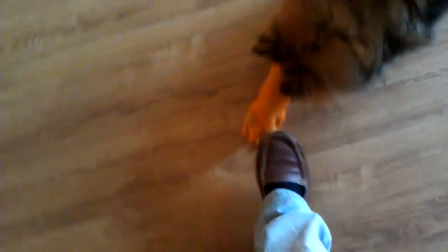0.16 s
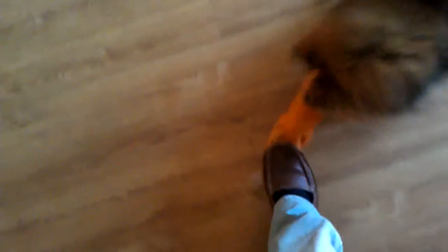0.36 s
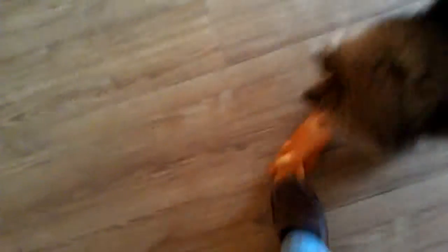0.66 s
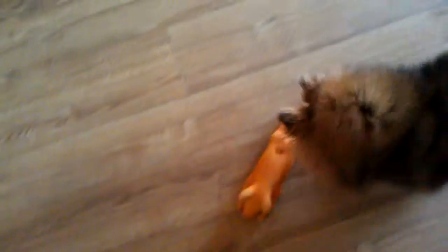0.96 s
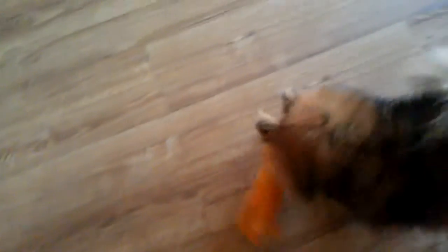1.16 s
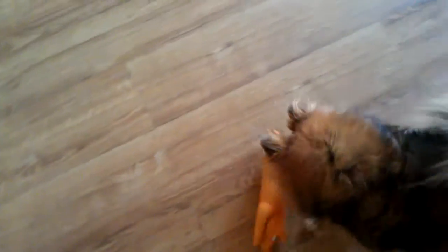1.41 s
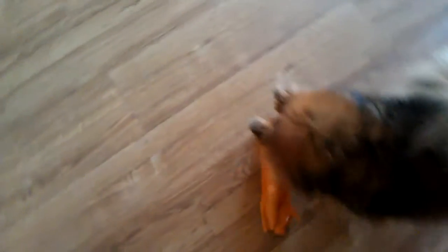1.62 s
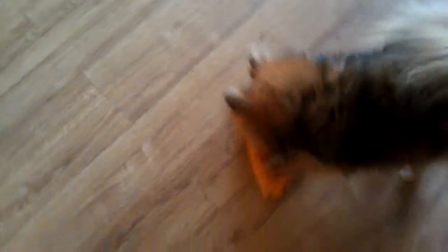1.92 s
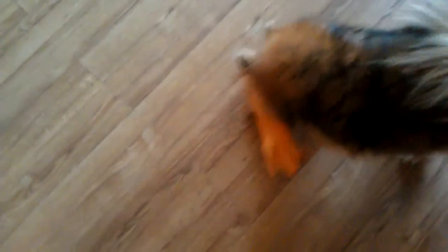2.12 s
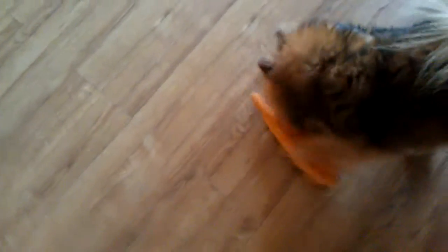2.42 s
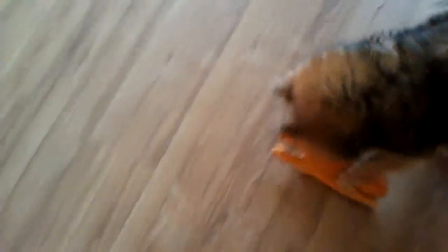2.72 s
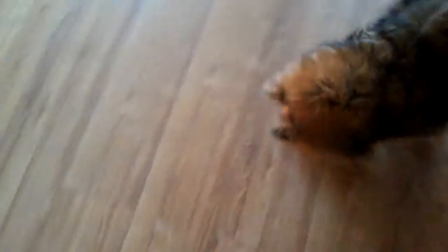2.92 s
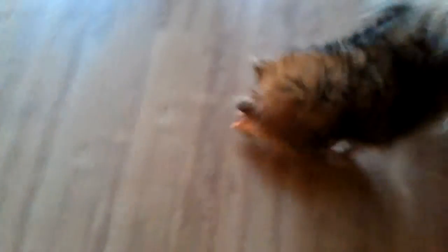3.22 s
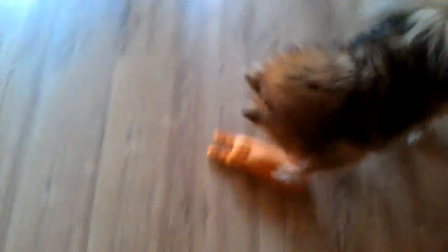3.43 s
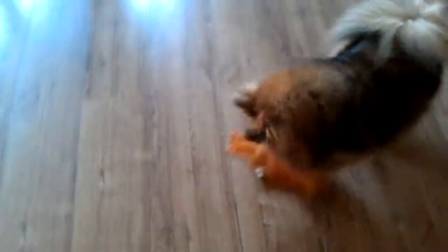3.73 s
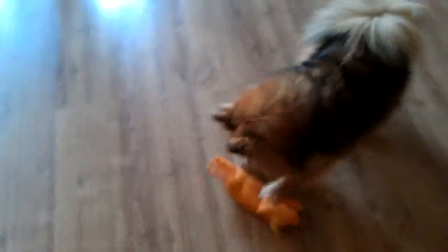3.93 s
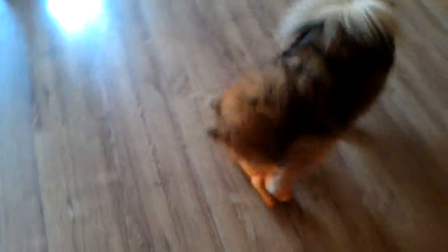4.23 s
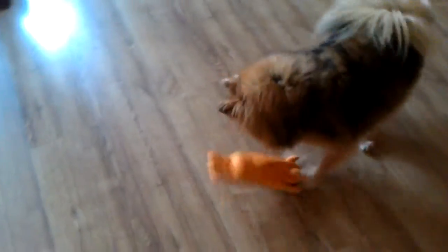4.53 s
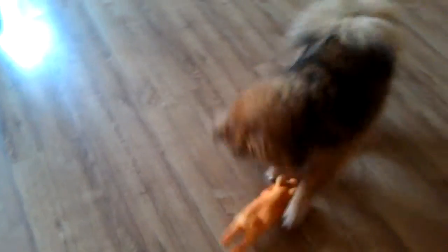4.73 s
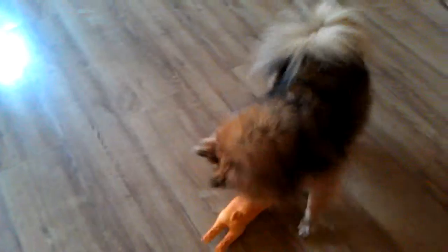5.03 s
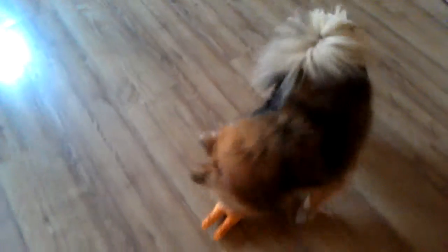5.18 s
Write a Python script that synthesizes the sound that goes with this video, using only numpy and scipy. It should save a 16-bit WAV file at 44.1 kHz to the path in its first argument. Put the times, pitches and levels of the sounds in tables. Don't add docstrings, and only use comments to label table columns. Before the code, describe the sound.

A small dog worries a rubber squeaky toy on laminate in a bare, echoing room, heard by a handheld stereo phone about a metre above. Light scuffs and claw ticks open; a weak nip squeaks at 0.3 s with a thump at 0.4, then a swelling nasal squeeze at 0.5-0.63. A short high double squeak at 1.1 ends in a sharp clicking slap at 1.2. After a quieter gap, a long squeak arches up and falls at 1.85-2.05. Small paw taps and a barely audible thin refill whistle follow around 2.3-2.6. A fluttering chew at 2.7-2.9 lands in heavy thumps. Activity then thickens: a faint nip at 3.43, firm squeak at 3.6, rising squeeze at 3.95-4.05, among claw clicks, rubber smacks and skitters. Weak nips at 4.5 and a low dying wheeze at 4.7 fade into small taps and scuffs until about 5.4.

```python
import sys
import numpy as np
from scipy import signal
from scipy.fft import rfft, irfft, next_fast_len
from scipy.io import wavfile
from scipy.ndimage import uniform_filter1d, map_coordinates

SR = 44100
rng = np.random.default_rng(int(sys.argv[2]) if len(sys.argv) > 2 else 0)


def gain_from_db(level_db):
    decades = np.asarray(level_db, float) / 20
    return 10 ** decades


def inscribe(sig):
    pcm = np.round(np.clip(np.atleast_2d(sig).T, -1, 1) * 32767)
    wavfile.write(sys.argv[1], SR, pcm.astype(np.int16))


N = 236263


def unit(x):
    return x / np.sqrt(np.mean(x ** 2) + 1e-20)


def along(points, hz):
    f, v = np.transpose(points)
    return np.interp(np.log(hz + 1), np.log(f + 1), v)


def wobble(rate):
    knots = rng.standard_normal(int(N * rate / SR) + 4)
    return map_coordinates(knots, [np.arange(N) * rate / SR])


def filtered(x, response):
    m = next_fast_len(x.shape[-1] + SR // 2)
    spectrum = rfft(x, m) * response(np.fft.rfftfreq(m, 1 / SR))
    return irfft(spectrum, m)[..., :x.shape[-1]]


def modes(table):
    def response(f):
        total = 0
        for k, (centre, width, db) in enumerate(table):
            total = total + (-1) ** k * gain_from_db(db) * 1j * f * width / (centre ** 2 - f * f + 1j * f * width)
        return total
    return response


def panned(x, db):
    return x * gain_from_db([[db / 2], [-db / 2]])


# freq_hz, left_right_likeness [0-1]
LIKENESS = [(30, .6), (70, 0.49), (125, 1), (300, 0.97), (600, 0.83), (1200, 0.58), (4000, 0.059)]


def diffuse(pair):
    def mid_side(hz):
        turn = np.arccos(np.clip(along(LIKENESS, hz), -1, 1)) / 2
        return np.array([np.cos(turn), np.sin(turn)])
    mid, side = filtered(pair, mid_side)
    return np.array([mid + side, mid - side])


# freq_hz, level_db [dB per Hz]
HUSH_SPECTRUM = [(15, -27.5), (25, -8), (55, -4.5), (87, -3), (231, 7.5), (938, -4.5), (2500, -5),
                 (4020, -9), (7000, -10), (7990, -12), (13900, -14)]


def air():
    hush = filtered(rng.standard_normal((2, N)), lambda hz: gain_from_db(along(HUSH_SPECTRUM, hz)))
    return gain_from_db(-52.5) * unit(diffuse(hush))


# start_s, length_s, level_db, fade_db [start to end], brightness_db
DRAG_STROKES = [(0.0, 0.084, -24.5, 30.5, -6.5), (0.436, 0.12, -29.5, 1.5, -7.5),
                (0.869, 0.064, -33, 8, -2), (0.932, 0.088, -41, -12, -8.5), (1.01, 0.038, -49.5, -9, 5),
                (1.024, 0.081, -38.5, 2, 8.5), (2.03, .17, -39.5, 9, 0), (1.195, 0.06, -11.5, 29.5, -21.5),
                (1.412, 0.15, -33.5, 23, -3), (2.34, .064, -39.5, 22, -6), (2.574, 0.26, -59, -12.5, -1.5),
                (2.885, 0.16, -22.5, 27, -13), (3.093, 0.13, -39, 22, 2), (3.469, 0.077, -27.5, 5.5, -6),
                (3.536, 0.044, -22.5, 5.5, -2), (3.66, 0.043, -27, 34.5, 1), (3.888, .05, -40, 2, -0.5),
                (4.042, .03, -27.5, -0.5, -6), (4.072, 0.068, -13.5, 19, -9),
                (4.272, 0.135, -45.5, -4.5, -13), (4.565, 0.11, -31.5, 4.5, -0.5),
                (4.762, 0.048, -33.5, 5, 4.5), (4.866, 0.11, -29.5, 8, -4), (5.072, 0.048, -44.5, 9, 4.5)]
# freq_hz, level_db [dB per Hz]
DRAG_SPECTRUM = [(410, -34.5), (700, -5.5), (933, -24.5), (2000, -3.5), (4410, -2), (5520, -2), (9100, -9),
                 (10800, -7), (13900, -18)]
# freq_hz, width_hz, level_db
FLOOR_BOARDS = [(132, 27, 0.5), (204.2, 27.2, 3.5), (250, 54, 0), (331.4, 51.6, -1.5), (438, 76, -7.5),
                (548, 61, -2.5), (756, 340, -10.5)]
# time_s, level_db
WEIGHT_SHIFTS = [(0.0, -58.5), (0.46, -44.5), (0.72, -72.5), (0.94, -48), (1.34, -41), (1.89, -85),
                 (2.1, -46), (2.42, -60), (2.76, -44), (2.88, -80.5), (3.39, -39), (3.69, -35),
                 (3.94, -35.5), (4.06, -45.5), (4.48, -48), (4.79, -40), (5.13, -80.5), (5.36, -41)]


def scuffs():
    t, dull, bright = np.arange(N) / SR, np.zeros(N), np.zeros(N)
    for start, length, db, fade_db, bright_db in DRAG_STROKES:
        edge = np.clip(np.minimum((t - start + 1 / SR) / 0.0012, (start + length - t) / 0.015), 0, 1)
        stroke = edge * gain_from_db(db - fade_db * np.clip((t - start) / length, 0, 1))
        dull += stroke * gain_from_db(-2.5)
        bright += stroke * gain_from_db(bright_db - 7)

    def below(hz):
        return gain_from_db(along([(300, -67.0)] + DRAG_SPECTRUM, hz)) / (1 + (hz / 6000) ** 6)

    def above(hz):
        return gain_from_db(along([(300, -60)] + DRAG_SPECTRUM, hz)) / (1 + (6000 / (hz + 1)) ** 6)

    clumps_db = 3 * wobble(500) + 3 * wobble(45)
    snags = rng.standard_normal((2, N)) * gain_from_db(clumps_db)
    hiss = diffuse(dull * unit(filtered(snags, below)) + bright * unit(filtered(snags, above)))
    creep = rng.standard_normal(N) * gain_from_db(4.2 * wobble(30))
    rumble = unit(filtered(creep, modes(FLOOR_BOARDS)))
    return hiss, gain_from_db(np.interp(t, *np.transpose(WEIGHT_SHIFTS))) * rumble


# freq_hz, t60_s
ROOM_DECAY = [(120, 0.31), (500, 0.44), (2000, 0.4), (5000, 0.34), (12000, 0.28)]


def room(x, gap_s):
    hz, t, z = signal.stft(rng.standard_normal((2, SR)), SR, nperseg=256)
    decay = gain_from_db(-60 * t / along(ROOM_DECAY, hz)[:, None])
    tail = diffuse(signal.istft(z * decay, SR, nperseg=256)[1])
    tail = np.pad(tail / np.linalg.norm(tail[0]), ((0, 0), (round(gap_s * SR), 0)))
    return signal.fftconvolve(x[None], tail, axes=1)[:, :N]


# start_s, level_db, left_right_db
PAW_LANDINGS = [(0.4212, -22.5, -1), (0.6937, -31, 0), (1.2005, -21, -3.5), (1.5318, -44.5, 8),
                (1.8163, -42.5, 2.5), (2.2094, -41, -10), (2.3068, -34.5, 0), (2.3445, -30, 0),
                (2.431, -26.5, 3), (2.4946, -33.5, -0.5), (2.5178, -33.5, -2), (2.533, -42, 2.5),
                (2.879, -19.5, 5), (2.909, -20, 13), (3.0976, -32.5, 1.5), (3.3524, -36.5, -9),
                (3.3737, -39.5, -3.5), (3.417, -36.5, 3.5), (3.7011, -15.5, 0), (4.357, -30.5, -3),
                (4.62, -30.5, 3.5), (4.552, -32.5, 1), (4.335, -30.5, .5)]
# start_s, level_db, left_right_db
CLAW_TAPS = [(0.0559, -26, -2), (0.165, -40, 0), (0.224, -43, -9.5), (0.4407, -21, -1.5), (0.922, -27, 1.5),
             (0.9564, -24.5, 0.5), (0.9953, -26, 1.5), (1.3399, -29.5, -4), (1.3788, -22.5, -0.5),
             (1.7928, -43, 3), (3.1277, -34, -3.5), (3.1727, -30, -3.5), (3.3316, -34, 0),
             (3.542, -17.5, -2.5), (3.8696, -14.5, 3.5), (4.0771, -15, 7.5), (4.2756, -22, 2),
             (4.336, -25, -1), (4.7723, -24.5, 3), (4.8986, -25.5, -2), (5.0425, -31.5, -1)]
# start_s, level_db, left_right_db
RUBBER_SMACKS = [(0.8734, -20.5, 2.5), (1.1905, -16.5, 2.5), (1.1985, -22, 0), (1.4156, -19, -0.5),
                 (1.4994, -39, 13.5), (2.431, -49.5, 1.4), (2.9863, -31.5, 3), (3.7474, -18.5, 0.5),
                 (4.1039, -20, 15), (4.4472, -35, 5.5), (4.5735, -20, 1), (4.7637, -21.5, 1.5),
                 (4.8558, -21, 25.5), (4.8986, -28, 2.5), (5.0797, -32.5, 1)]
# start_s, level_db, pitch_hz
SOFT_THUMPS = [(0.324, -20, 516), (0.388, -28.5, 252), (0.4223, -13.5, 485), (0.472, -31, 428),
               (1.164, -23, 405), (1.261, -29, 260), (1.612, -42, 322), (2.04, -60, 237),
               (2.068, -30.5, 208), (2.183, -32, 238), (2.368, -36, 248), (2.919, -16, 250),
               (3.019, -31, 207), (3.474, -20.5, 191), (3.506, -20.5, 289), (3.598, -26.5, 249),
               (3.678, -24, 207), (3.749, -41, 210), (3.802, -35.5, 278), (3.902, -18.5, 264),
               (4.057, -23, 239), (4.299, -28.5, 250), (4.624, -17.5, 333), (4.644, -20, 316),
               (5.275, -35.5, 235), (5.326, -47, 247)]
# freq_hz, width_hz, level_db
CLAW_MODES = [(2434, 530, 4.5), (1020, 580, -1.5), (4000, 640, -5)]
# freq_hz, width_hz, level_db
SLAP_MODES = [(6160, 3200, -1), (11000, 3500, 0), (3160, 2600, -3)]


def contacts():
    tick, push, slap = np.zeros((2, N)), np.zeros(N + SR), np.zeros((2, N + SR))
    t = np.arange(SR // 4) / SR
    # (claw tick dB, board thump dB, bright slap dB)
    kinds = ((PAW_LANDINGS, (-0.8, 2.6, -16)), (CLAW_TAPS, (0, -9.5, -16)), (RUBBER_SMACKS, (-26.5, -9.5, 0)))
    for rows, mix in kinds:
        for start, db, pan in rows:
            i = round(start * SR)
            tick_db, thump_db, slap_db = db + np.array(mix)
            tick[:, i:i + 1] += panned(gain_from_db(tick_db + 24), pan)
            scatter = rng.standard_normal(len(t)) * gain_from_db(-60 * t / 0.03)
            push[i:i + len(t)] += gain_from_db(thump_db + 28) * 0.4 * (gain_from_db(-60 * t / 0.002) + scatter)
            common, *own = rng.standard_normal((3, len(t)))
            burst = common * gain_from_db(-60 * t / 0.007) + 0.35 * np.array(own) * gain_from_db(-60 * t / 0.1)
            slap[:, i:i + len(t)] += panned(gain_from_db(slap_db + 1.5) * burst, pan)
    for start, db, hz in SOFT_THUMPS:
        push[round(start * SR):][:len(t)] += gain_from_db(db + 8 - 60 * t / 0.023) * np.sin(2 * np.pi * hz * t)
    thumps = filtered(push[:N], lambda hz: modes(FLOOR_BOARDS)(hz) / (1 + 1j * hz / 900) ** 2)
    ticks = filtered(tick, lambda hz: modes(CLAW_MODES)(hz) / (1 + 1j * hz / 4000) ** 2)
    return ticks + filtered(slap[:, :N], modes(SLAP_MODES)), thumps


# time_s, pitch_hz, level_db
EARLY_BITES = [
    [(.298, 920, -32.5), (.308, 942, -27), (.322, 947, -22.5), (.34, 923, -23.5), (.358, 854, -26),
     (.372, 879, -27.5), (.392, 847, -30.5), (.42, 841, -36)],
    [(.497, 872, -23), (.512, 909, -21.5), (.542, 951, -15), (.556, 948.7, -11.5), (.572, 941, -10),
     (.593, 918, -14.5), (.612, 850, -22.5), (.62, 794, -35), (.64, 690, -52.5)],
    [(1.086, 957, -22.5), (1.096, 1033, -18.5), (1.107, 1082, -17.5), (1.125, 1126, -8.5),
     (1.15, 1124, -12.5), (1.163, 1096, -8), (1.176, 1020, -11.5), (1.186, 950, -19.5)],
    [(1.849, 896, -20), (1.868, 989, -16), (1.893, 1053, -11), (1.925, 1092, -10.5), (1.955, 1068, -7),
     (1.98, 995, -14.5), (2.002, 879, -18.5), (2.03, 779, -37), (2.07, 718, -35)],
    [(2.708, 877, -27), (2.733, 980, -9.5), (2.752, 935, -11.5), (2.774, 969, -8.5), (2.806, 869.5, -18.5),
     (2.835, 932, -11.5), (2.849, 898, -16), (2.862, 917, -15), (2.889, 864, -21)],
]
# time_s, pitch_hz, level_db
LATE_BITES = [
    [(3.425, 918, -22), (3.434, 953, -24), (3.447, 990, -17.5), (3.46, 1013, -20), (3.472, 1007, -18.5),
     (3.484, 984, -25.5), (3.495, 960, -31.5)],
    [(3.571, 990, -19), (3.59, 1043, -9.5), (3.61, 1057, -9), (3.628, 1014, -8), (3.642, 996, -14.5),
     (3.657, 961, -17.5), (3.668, 850, -18.5)],
    [(3.936, 969, -19), (3.956, 1025, -10.5), (3.965, 1024, -17.5), (3.972, 1031, -12), (3.99, 1088, -8),
     (4.008, 1096, -5.5), (4.026, 1087, -10), (4.038, 999, -15.5), (4.05, 913, -14)],
    [(4.515, 783, -35), (4.532, 881, -31.5), (4.552, 877.5, -24.5), (4.566, 837, -41)],
    [(4.66, 735, -32), (4.68, 760, -25.5), (4.705, 742.2, -27.5), (4.73, 733, -38), (4.76, 722, -39),
     (4.8, 712, -44)],
]
# freq_hz, level_db
REED_TUBE = [(700, -26.5), (1100, -11.5), (2200, -8.5), (3200, -11), (4300, 2), (5300, -9), (6500, -19),
             (8000, -23.5), (11000, -27), (14000, -44.5)]
# left_right_db, floor_echo_left_ms, floor_echo_right_ms,
# start_slack [0-1], brightness [dB per octave at full bite]
TOY_PLACES = [(1.5, .31, 0.43, 0.5, 1.5), (2, .33, 0.37, 0.05, -0.5), (4.5, 0.35, 0.74, 0.3, 5),
              (5, 0.323, 0.27, 0.12, 2), (3.5, 0.322, 0.37, 0.3, 2), (4.5, 0.4, 0.61, 0.04, 3),
              (4.5, 0.33, 0.88, 0.08, 3.5), (8, 0.29, 0.32, 0.05, 5.5), (4, 0.88, 0.29, 0.14, 2.5),
              (3.5, 0.28, 0.24, 0.1, 1.5)]
# level_db of overtones 1, 2, 3, 5, 6
OVERTONE_SHADES = [(12, 4.5, 5.5, -4.5, -7.5), (-4, -10, -5, -2.5, -3), (5.5, 9, 10.5, -2.5, 4.5),
                   (-4, -3.5, -5, -1, 0), (-8, -8, -7.5, -3.5, -7.5), (6.5, -1, 3, -10.5, -1.5),
                   (0, -5.5, -2.5, -1, 0.5), (4, 1.5, -1, -0.5, 3.5), (5.5, -1, -1.5, -11, -6),
                   (10, -3.5, -1.5, -9, -12.5)]
UPPER_OVERTONES_DB = [-3.5, -3.5, 1.5, -1.5, -5.5, 0, -1, -2, -1.5, -7]
WALL_SENDS_DB = [-.5, -4, 0.5, 0, -3, 1.5, 0, -0.5, -2, -1.5]
SPEAKING_MS = [3.5, 7, 3.5, 7, 3.2, 2, 4, 2.5, 8.7, 6]
FLICKER_DB = [4, .8, 3.5, 2.2, 1.3, 4.5, 3, 2.3, 4, 3.2]
TURBULENCE = [.22, .03, .2, .25, .12, .35, .2, .26, .2, .16]


def squeaks():
    toy, sent, orders = np.zeros((2, N)), np.zeros(N), np.arange(1, 19)[:, None]
    flutter, air_rush = wobble(110), wobble(1200)
    bites = zip(EARLY_BITES + LATE_BITES, TOY_PLACES, OVERTONE_SHADES, UPPER_OVERTONES_DB, WALL_SENDS_DB,
                SPEAKING_MS, FLICKER_DB, TURBULENCE)
    for curve, place, shade, upper_db, send_db, onset_ms, flicker_db, breathy in bites:
        pan, left_ms, right_ms, slack, bright = place
        s, curve_hz, curve_db = np.transpose(curve)
        at = np.arange(round(s[0] * SR), round(s[-1] * SR))
        hz, db = np.interp(at / SR, s, curve_hz), np.interp(at / SR, s, curve_db)
        age, left = at / SR - s[0], s[-1] - at / SR
        hz = uniform_filter1d(hz, size=350) * (1 - slack * np.exp(-age / 0.0042))
        hz *= 1 + 0.0053 * flutter[at]
        partials = orders * hz

        tilt = bright + 0.38 * (db - db.max())
        gains = gain_from_db(along(REED_TUBE, partials) + tilt * np.log2(partials / 4000))
        gains[[0, 1, 2, 4, 5]] *= gain_from_db(shade)[:, None]
        gains[6:] *= gain_from_db(upper_db)
        speak_ms = onset_ms + 0.52 * orders
        swell = np.minimum(age * 1000 / speak_ms, 1) ** 2 * np.minimum(left / 0.0014, 1)
        gains *= gain_from_db(db - 3.5) * swell / np.sqrt(np.sum(gains ** 2, axis=0) / 2)

        knots = rng.standard_normal((len(orders), 64))
        gains *= gain_from_db(flicker_db * np.array([map_coordinates(row, [age * 130]) for row in knots]))
        gains *= 1 + 0.023 * flicker_db * air_rush[at]
        gains *= 1 + breathy * (partials / 5000) ** 1.5 * air_rush[(at + 4999 * orders) % N]

        phases = 2 * np.pi * orders * np.cumsum(hz) / SR + rng.uniform(0, 2 * np.pi, orders.shape)
        for side, pan_share, echo_ms in ((0, 0.37, left_ms), (1, -1.5, right_ms)):
            bounce = 1 + 0.3 * np.exp(-2j * np.pi * partials * echo_ms / 1000)
            heard = np.sum(gains * (bounce * np.exp(1j * phases)).imag, axis=0)
            toy[side, at] += gain_from_db(pan_share * pan / 2) * heard
        sent[at] = gain_from_db(send_db) * toy[0, at]
    return toy, sent


# delay_ms, left_db, right_db
FIRST_ECHOES = [(4.443, -19, -21.5), (7.847, -41.5, -1), (11.17, -19.5, -29), (14.56, -13.5, -13),
                (19.35, -2, -27), (23.96, -5.5, -22)]


def walls(x):
    def echoes(hz):
        return sum(gain_from_db([[left_db], [right_db]]) * np.exp(-2j * np.pi * hz * ms / 1000)
                   for ms, left_db, right_db in FIRST_ECHOES)
    return filtered(x, echoes)


# start_s, level_db, pitch_hz, t60_ms, left_right_db
RINGING_CLICKS = [(0.6915, -19.5, 2300, 8.5, 0), (0.4435, -24, 5100, 6.6, -2.5), (0.4, -22.5, 2500, 10, -1),
                  (1.191, -4.5, 6300, 13, 9), (1.199, -6.5, 3500, 19, 1.5), (1.232, -18, 7700, 10, 0),
                  (1.218, -9.5, 4200, 13, 0), (2, -32, 2130, 7, 1), (2.340, -34, 5550, 4.7, 6),
                  (2.6, -26.5, 2160, 7.4, 1.5), (2.2, -37, 5600, 4.6, 3.5), (4.7, -36, 1538, 5.4, 1),
                  (2.432, -28, 4860, 5.5, 6), (2.441, -38, 2335, 8, 1), (2.446, -43.5, 4200, 6, -2),
                  (1.9, -36.5, 1300, 6, -2.5), (2.882, -20.5, 270, 60, .5), (2.905, -15.5, 245, 90, -0.5),
                  (3.704, -22.5, 520, 48, 3), (3.72, -28.5, 600, 33, .5), (0.459, -24.5, 450, 30, .5),
                  (0.386, -26, 520, 20, 0), (2.937, -26, 245, 91, 0), (3.536, -19.5, 1800, 8, -6),
                  (3.543, -10.5, 920, 9.6, 1), (3.542, -18, 4200, 7.3, -0.5), (3.536, -20, 5500, 6, 1.5),
                  (4.609, -25, 1480, 8, .5), (3.098, -29, 9900, 5.7, 1.5), (4.357, -33, 7000, 4.8, -2),
                  (1.601, -44.5, 2300, 8, .5), (4.32, -27.5, 590, 16, 0), (3.549, -15, 2410, 10, -3.5),
                  (4.6, -22.5, 800, 15, 1), (4.278, -23.5, 2200, 10, -4.5), (4.284, -18.5, 1100, 4, -2.5),
                  (4.356, -27, 5200, 7.5, 2.5), (4.361, -23.5, 1510, 13, -0.5), (4.365, -27, 2240, 11, 1),
                  (4.374, -32.5, 1800, 11, -0.5), (4.9, -35, 1300, 7.5, 0),
                  (3.8705, -15, 2280, 6, 2.5), (3.871, -24, 5040, 10, 4), (3.878, -24.5, 705, 10, -0.5),
                (3.878, -22, 2340, 7.3, 0.5), (3.889, -30, 2000, 8, -1.5), (3.901, -28, 2200, 7.3, -2),
                (4.087, -13, 2200, 11, -1.5), (4.094, -14, 1800, 9, -2), (4.581, -22.5, 3340, 8.1, 2.5),
                (4.608, -21.5, 3500, 6, 0.5), (4.913, -28.5, 3000, 9.1, -1), (3.114, -32.5, 1300, 8.4, 0),
                (2.91, -27, 10500, 4, -1)]


def clicks():
    out, t = np.zeros((2, N + SR)), np.arange(SR // 4) / SR
    for start, db, hz, t60_ms, pan in RINGING_CLICKS:
        note = gain_from_db(db - 60 * t * 1000 / t60_ms) * np.sin(2 * np.pi * hz * t)
        out[:, round(start * SR):][:, :len(t)] += panned(note, pan)
    return out[:, :N]


# time_s, pitch_hz, level_db
REFILL_WHISTLE = [
    (2.4, 12300, -85),
    (2.46, 11900, -74),
    (2.53, 12200, -67),
    (2.59, 12900, -63.5),
    (2.66, 12700, -80),
]


def leak():
    s, hz, db = np.transpose(REFILL_WHISTLE)
    t = np.arange(N) / SR
    pitch = np.interp(t, s, hz) * (1 + 0.004 * wobble(150))
    return gain_from_db(np.interp(t, s, db, left=-150, right=-150)) * np.sin(2 * np.pi * np.cumsum(pitch) / SR)


def scene():
    hiss, rumble = scuffs()
    ticks, thumps = contacts()
    ticks = ticks + clicks()
    toy, sent = squeaks()
    drift = 1.2 * wobble(14)
    toy_tail = room(np.cos(drift) * sent, gap_s=0.008) + room(np.sin(drift) * sent, gap_s=0.008)
    low_down = gain_from_db(-1.5) * ticks.mean(axis=0) + gain_from_db(-1.5) * thumps + gain_from_db(-3.5) * hiss[0]
    wet = gain_from_db(-3.5) * walls(sent) + gain_from_db(-2.5) * toy_tail + room(low_down, gap_s=0.0039)
    return toy + ticks + thumps + hiss + rumble + wet + leak()


def masked(x, depths):
    hz, _, z = signal.stft(x, SR, nperseg=2048)
    power = uniform_filter1d(np.abs(z) ** 2, size=11, axis=1)
    bar = power.max(axis=(0, 1)) * gain_from_db(-2 * along(depths, hz + 1))[:, None]
    return signal.istft(z / (1 + (bar / (power + 1e-30)) ** 3), SR, nperseg=2048)[1][:, :N]


def roll_off(x):
    return signal.sosfilt(signal.butter(12, 14080, fs=SR, output="sos"), x)


def record(dry):
    heard = filtered(dry, lambda hz: (1j * hz / (105 + 1j * hz)) ** 4) + air()
    kept = masked(heard, depths=[(60, 43), (300, 43), (1500, 43), (3000, 35), (7000, 40), (13000, 44)])
    return roll_off(np.clip(kept, -1, 1))


dry = scene()
out = record(dry)
inscribe(out)
```